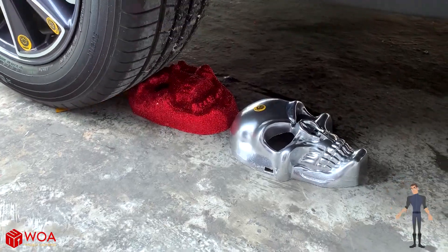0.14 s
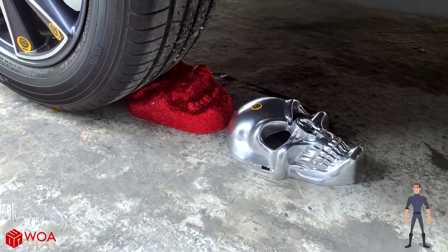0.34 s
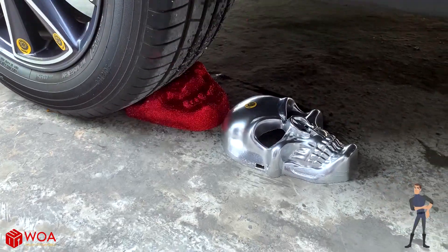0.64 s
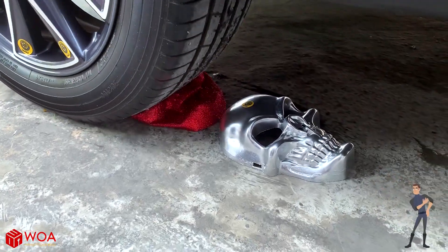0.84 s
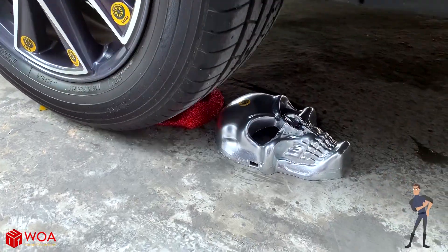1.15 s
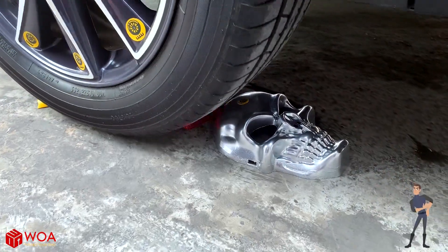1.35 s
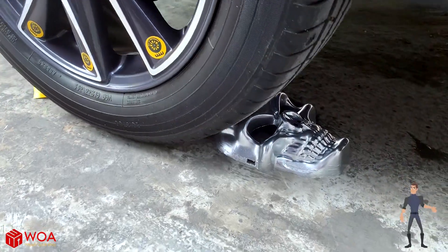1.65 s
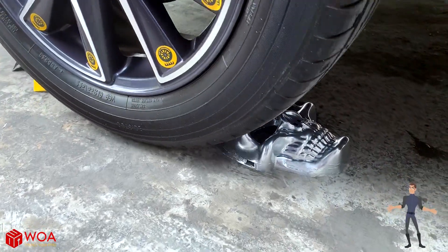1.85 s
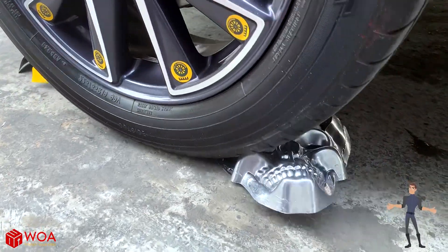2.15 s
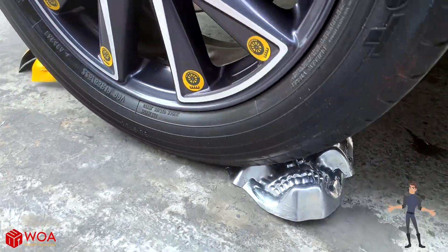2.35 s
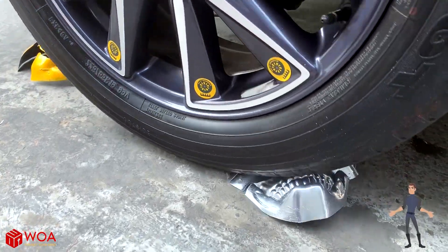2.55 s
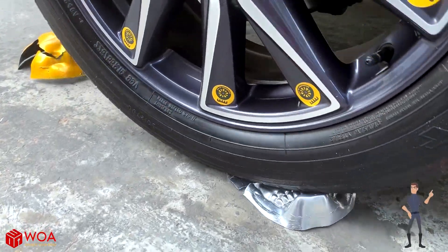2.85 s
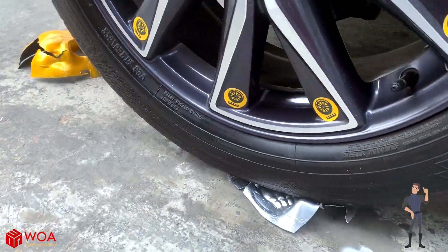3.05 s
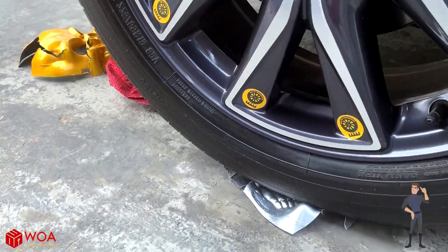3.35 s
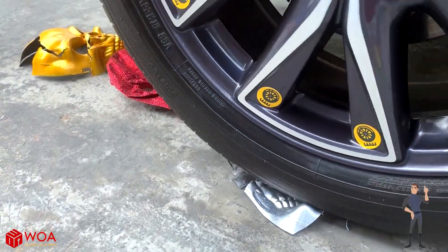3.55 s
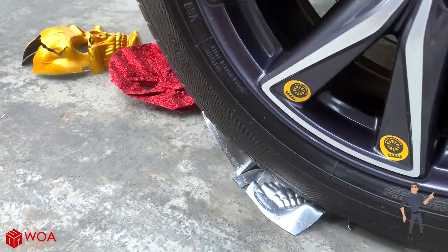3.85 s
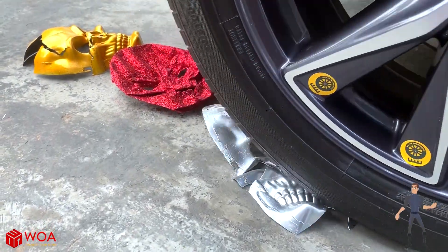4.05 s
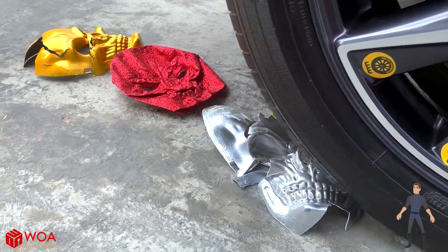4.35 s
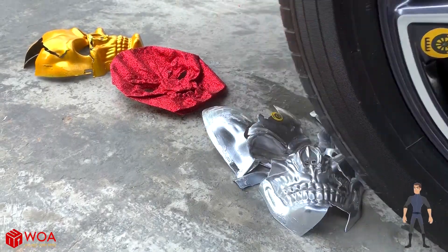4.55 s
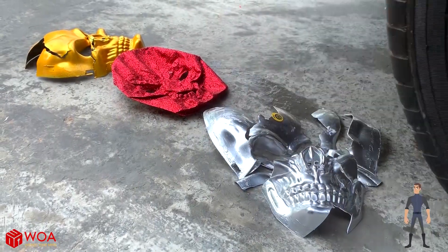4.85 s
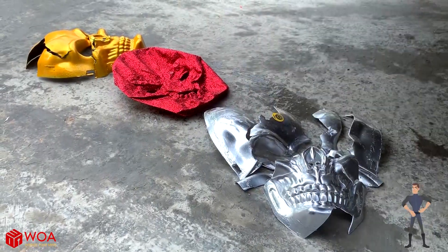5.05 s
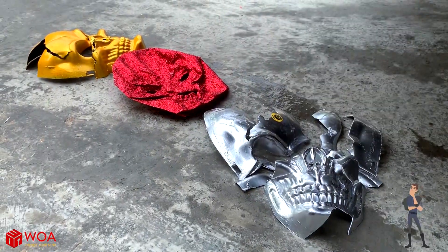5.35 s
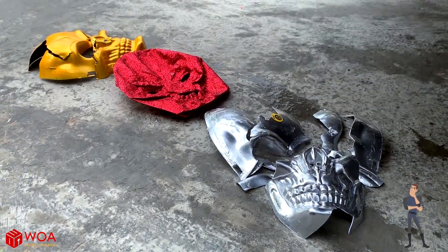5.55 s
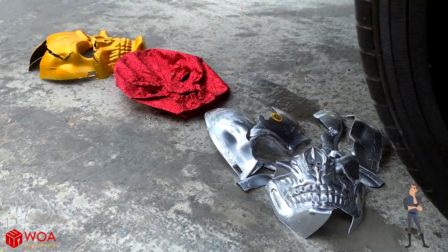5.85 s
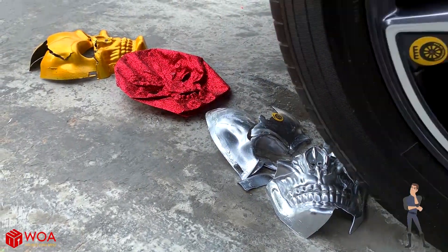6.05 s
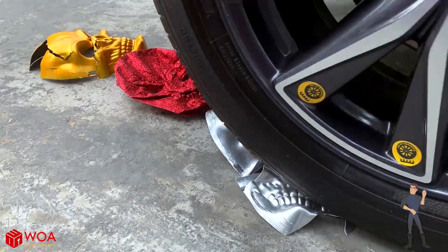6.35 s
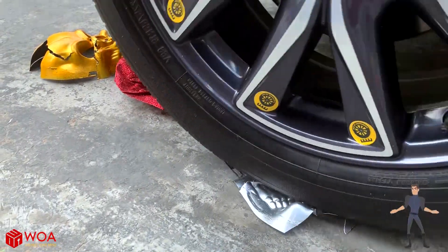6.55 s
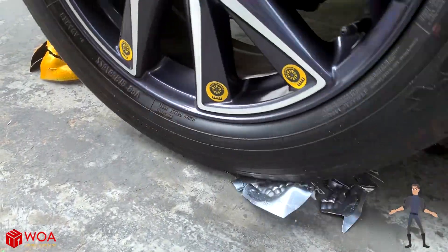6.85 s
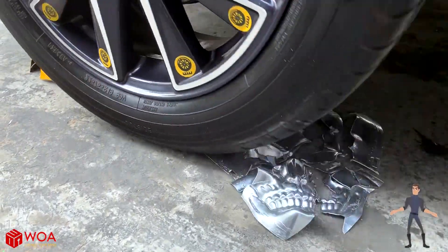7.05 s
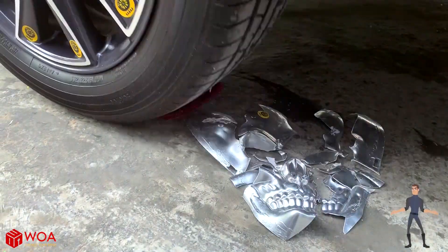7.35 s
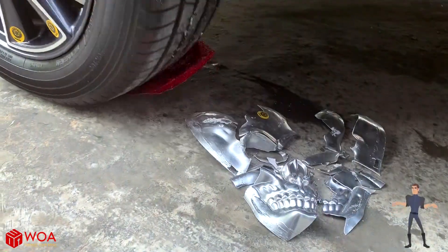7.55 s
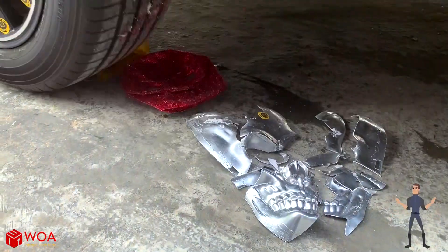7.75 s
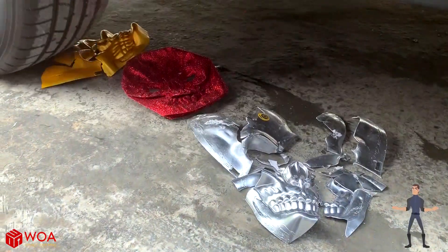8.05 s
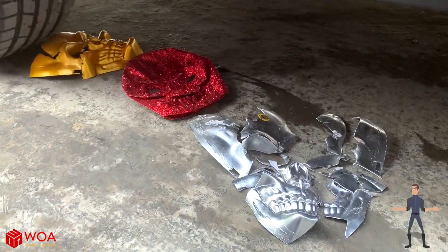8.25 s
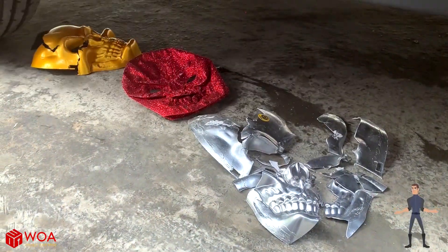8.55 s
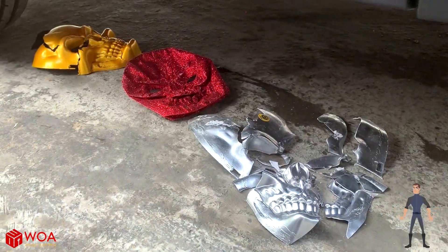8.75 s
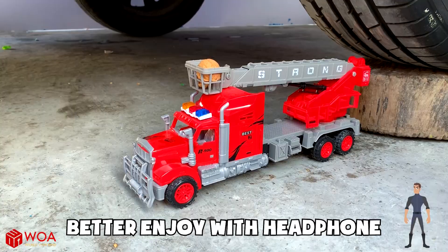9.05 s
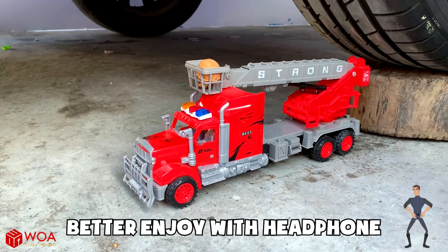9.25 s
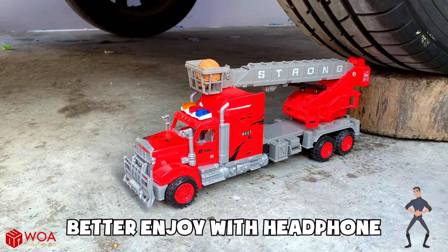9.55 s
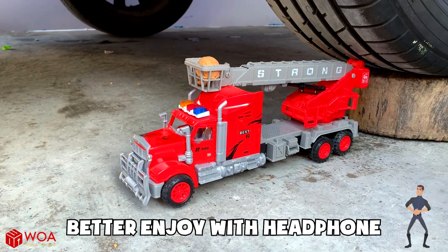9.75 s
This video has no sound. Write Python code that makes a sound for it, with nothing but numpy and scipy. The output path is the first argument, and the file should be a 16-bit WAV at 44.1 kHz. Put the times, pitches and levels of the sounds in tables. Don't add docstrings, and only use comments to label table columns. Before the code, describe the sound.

A car engine idles throughout, a low fluttering rumble with soft hiss and ticks, heard close to a tyre on concrete. From 0 to 0.7 s a hollow plastic shell snaps and crunches with soft tyre thuds; from 0.7 to 1.7 s a tougher one buckles in quick knocks and creaks. At about 1.75 s a brittle shell caves in, with the loudest, clipping cracks near 1.9-2.05 s, then splintering and heavy thuds until 3.4 s, fading to small ticks by 4.3 s. Mostly engine remains, quieter, with slight changes at 5.4 and 5.6 s. From 6.2 s the car rolls back over the pieces, crackling, with hard snaps around 7.2-7.3 s, as the engine sags. Creaks thin out by 8.3 s and a faint belt squeak appears. After a tiny silence at 9.05 s, idle is hissier and tickier with a steady whine, slowing, and faint plastic pieces settle near 9.75 s.

```python
import sys
import numpy as np
from scipy import signal
from scipy.fft import rfft, irfft, next_fast_len
from scipy.io import wavfile
from scipy.ndimage import uniform_filter1d, map_coordinates

SR = 44100
rng = np.random.default_rng(int(sys.argv[2]) if len(sys.argv) > 2 else 0)


def int16_out(signal):
    q = np.round(np.clip(np.atleast_2d(signal).T, -1, 1) * 32767)
    wavfile.write(sys.argv[1], SR, q.astype(np.int16))


def level_to_linear(level):
    exponent = np.asarray(level, float) / 20
    return 10 ** exponent


N = 437472
LAST_SHOT_S = 9.05


def unit(x):
    return x / np.sqrt(np.mean(x ** 2) + 1e-20)


def along(points, hz):
    f, v = np.transpose(points)
    return np.interp(np.log(hz + 1), np.log(f + 1), v)


def curves(rows, outside=None):
    s, *cols = np.transpose(rows)
    return [np.interp(np.arange(N) / SR, s, c, outside, outside) for c in cols]


def wobble(rate):
    knots = rng.standard_normal(int(N * rate / SR) + 4)
    return map_coordinates(knots, [np.arange(N) * rate / SR])


def spread(pair, spectrum, alike):
    m = next_fast_len(N + 8192)
    hz = np.fft.rfftfreq(m, 1 / SR)
    turn = np.arccos(np.clip(along(alike, hz), -1, 1)) / 2
    mid, side = rfft(pair, m) * level_to_linear(along(spectrum, hz)) * [np.cos(turn), np.sin(turn)]
    return unit(irfft([mid + side, mid - side], m)[:, :N])


def place(s, rows):
    at = np.round(np.asarray(s) * SR).astype(int)[:, None] + np.arange(rows.shape[1])
    return np.bincount(np.clip(at, 0, N).ravel(), rows.ravel(), N + 1)[:N]


# multiple, level_db under order 3
WEAK_ORDERS = [(2, -7), (4, -8), (6, -9.5), (7, -23), (8, -12.5), (9, -18.5), (10, -15.5), (11, -31.5),
               (12, -21), (14, -27.5), (16, -18)]


def firing_orders(rate, load_db, turn):
    t = np.arange(N) / SR
    first_db = np.where(t > LAST_SHOT_S, load_db + 0.5, 0.74 * load_db - 3.5 + 3.5 * (rate - 23.3))
    boom_hz, boom_width_hz, boom_db = 106.9, 3, 7.5
    boom = boom_db * np.exp(-((5 * rate - boom_hz) / boom_width_hz) ** 2)
    fifth_db = load_db + np.where(t > LAST_SHOT_S, -3.5, boom)
    orders = [(1, first_db), (3, load_db), (5, fifth_db)]
    orders += [(k, load_db + db) for k, db in WEAK_ORDERS]
    drift = [.06 * k * wobble(6) - .07 * k * k for k, _ in orders]
    tone = 0
    for (k, db), slip in zip(orders, drift):
        tone = tone + level_to_linear(db + wobble(7.6)) * np.cos(k * turn + slip - .9)
    return -np.sqrt(2) * tone * level_to_linear([[-.6], [.6]])


# pitch_hz, level_db
BELT_WHINE = [(517, -59), (597.5, -50)]


def belt(turn):
    t = np.arange(N) / SR
    squeak_db = -62.5 - 5 * (t > 8.85) + 10 * np.cos(turn) + 2 * wobble(14)
    squeak = level_to_linear(squeak_db) * np.sin(2 * np.pi * 3230 * t + 1.1 * wobble(250)) * (t > 8.44)
    whine = 0
    for hz, db in BELT_WHINE:
        level = level_to_linear(db + 6 + .8 * wobble(9))
        whine = whine + level * np.sin(2 * np.pi * hz * t + 0.3 * wobble(25))
    return squeak + whine * (t > LAST_SHOT_S)


# time_s, firing_rate_hz, load_db
IDLE = [(0, 22.3, -30), (.45, 22.3, -31), (.58, 23.4, -30), (1.6, 23.4, -28), (2.3, 23.3, -29),
        (3, 23.3, -32), (3.7, 23.1, -39), (4.05, 22.8, -38), (4.3, 23.5, -37), (5.35, 22.8, -36),
        (5.65, 23.6, -32), (6.5, 22.55, -29), (6.85, 22.1, -27), (7.5, 21.1, -30.5), (8.3, 20, -38),
        (9.04, 21, -39), (9.07, 21, -40), (9.92, 18.85, -40)]
# frequency_hz, density_db_per_hz
ROAR_COLOUR = [(15, -27), (25, -4), (119, -4), (209, -13), (275, -14), (362, -20), (1500, -34.5),
               (1950, -70.5), (3300, -120)]
# frequency_hz, density_db_per_hz
HISS_COLOUR = [(410, -5), (700, -12), (1770, -16.5), (2170, -18), (5110, -25.5), (8000, -38), (10400, -64),
               (17600, -120)]
# frequency_hz, density_db_per_hz
TICK_COLOUR = [(3820, -36.5), (6500, -10), (7570, -11), (9700, -10), (11300, -4), (13100, -6), (15500, -21)]
# frequency_hz, left_right_likeness
ENGINE_WIDTH = [(60, 0.98), (300, 0.69), (700, 0.2), (1500, -0.35), (3000, 0.073), (15000, -0.097)]
# start_s, hiss_db, tick_db, tick_rise_db_per_s (as the car backs up)
CAMERA_SPOTS = [
    (0, -51.5, -65, -0.5),
    (5.39, -55.5, -72.5, 6),
    (5.626, -48, -63.5, 2.5),
    (9.05, -46, -53.5, 3),
]


def engine():
    t = np.arange(N) / SR
    rate, load_db = curves(IDLE)
    turn = 2 * np.pi * np.cumsum(rate) / SR
    spots = np.transpose(CAMERA_SPOTS)
    start, hiss_db, tick_db, rise = spots[:, np.searchsorted(spots[0], t, 'right') - 1]
    tick_db = tick_db + rise * (t - start)

    def puffs(depth_db, order):
        return rng.standard_normal((2, N)) * level_to_linear(depth_db * np.cos(order * turn) + 1.3 * wobble(32))

    muffled = np.abs(t - 5.51) < .12
    roar_db = load_db + 1.6 + 2.2 * wobble(6) - 3 * muffled
    roar = level_to_linear(roar_db) * spread(puffs(2.5, 2), ROAR_COLOUR, ENGINE_WIDTH)
    hiss = level_to_linear(hiss_db + 5.5) * spread(puffs(0.86, 0.94), HISS_COLOUR, ENGINE_WIDTH)
    shaded = [(hz, db - 14 * (hz > 11000)) for hz, db in TICK_COLOUR]
    open_ticks = spread(puffs(3.7, 1), TICK_COLOUR, ENGINE_WIDTH)
    shaded_ticks = spread(puffs(3.3, 0.87), shaded, ENGINE_WIDTH)
    ticks = level_to_linear(tick_db + 4) * np.where(t > LAST_SHOT_S, open_ticks, shaded_ticks)
    return firing_orders(rate, load_db, turn) + roar + hiss + ticks + belt(turn)


# frequency_hz, t60_s
YARD_DECAY = [(300, 0.27), (2000, 0.26), (10000, 0.3)]


def yard(x):
    hz, t, z = signal.stft(x, SR, nperseg=256)
    fade = level_to_linear(-120 * t[:120] / along(YARD_DECAY, hz)[:, None]) * (t[:120] > .004)
    fade = fade / fade.sum(axis=1, keepdims=True)
    power = signal.fftconvolve(np.abs(z) ** 2, fade[None], axes=2)[..., :len(t)]
    air = signal.stft(rng.standard_normal((2, N)), nperseg=256)[2]
    air = air + air[::-1] / 2
    air = air / np.sqrt(np.mean(np.abs(air) ** 2))
    return signal.istft(np.sqrt(np.abs(power)) * air, nperseg=256)[1][:, :N]


# start_s, peak_db, thud_hz, tyre_air_db
TYRE_DROPS = [(0.069, -11.5, 317, -11), (0.218, -12, 103, -19), (0.589, -26, 300, -7.5),
              (1.769, -23, 315, -1), (1.964, -2, 143, -15), (2.018, -1.5, 198, -20.5),
              (2.622, -5.5, 90.5, -23), (2.79, -10.5, 260, -20), (2.899, -14.5, 196, -2),
              (3.158, -10.5, 266, -8), (3.202, -7, 122.7, -15.5), (7.298, -14, 105.7, -15.5)]


def drops():
    s, db, hz, air_db = np.transpose(TYRE_DROPS)[:, :, None]
    t = np.arange(SR * 3 // 4) / SR
    tyre_hz = 196
    thud = level_to_linear(db + 1 - 60 * t / 0.097) * np.sin(2 * np.pi * hz * t) * (1 - np.exp(-t / 0.0028))
    air = level_to_linear(db + air_db - 60 * t / 1.73) * np.sin(2 * np.pi * tyre_hz * t) * (1 - np.exp(-t / 0.0041))
    return place(s[:, 0], thud + air)


def grains(count, hz, cycles, scatter_db):
    t, pair = np.arange(384) / SR, []
    for _ in range(2):
        luck = rng.random((count, 2))
        f = np.clip(hz * np.exp(0.667 * rng.standard_normal((count, 1))), 100, SR / 2.2)
        size = level_to_linear(-scatter_db * np.log(luck[:, :1] + 1 / 50))
        grain = size * np.exp(-t * f / cycles) * np.sin(2 * np.pi * f * t)
        pair.append(place(luck[:, 1] * N / SR, grain))
    return unit(np.array(pair) * level_to_linear(3.36 * wobble(40)))


def mottled(x, patchy_db):
    z = signal.stft(x, nperseg=256)[2]
    field = uniform_filter1d(rng.standard_normal(z.shape[1:]), size=3, axis=0)
    field = uniform_filter1d(field, size=9, axis=1)
    return unit(signal.istft(z * level_to_linear(patchy_db * unit(field)), nperseg=256)[1][:, :N])


# splinter_db re pressure, then rows of time_s, pressure_db
CRUSH_BOUTS = [
    (-7, [(0, -24), (.1, -22.5), (.43, -29.5), (.6, -25.5), (.7, -29), (.8, -26.5), (1, -26.5), (1.25, -26.5), (1.73, -31)]),
    (-5.5, [(1.73, -36), (1.92, -22), (2.11, -24.5), (2.3, -34.5), (2.67, -27.5), (2.89, -23), (3.72, -47), (4.4, -87)]),
    (-5, [(6.2, -51), (6.25, -39), (6.36, -32.5), (6.48, -34), (6.56, -41), (6.78, -33.5), (7, -26.5)]),
    (-10, [(7, -28.5), (7.17, -24), (7.36, -26.5), (7.55, -28.5), (7.8, -30), (7.96, -38.5), (8.26, -44), (8.45, -47)]),
    (-26, [(9.72, -51), (9.75, -41), (9.78, -51), (9.81, -43), (9.84, -45), (9.92, -49.5)]),
]


def pressure():
    bouts = [curves(bout, outside=-120)[0] + [[0], [db]] for db, bout in CRUSH_BOUTS]
    return np.max(bouts, axis=0)


# centre_s, half_length_s, rise_db
CRUSH_SWELLS = [(0.001, 0.024, 6.5), (0.33, 0.031, 3), (4.047, 0.052, 17.5), (7.884, 0.055, 8.5),
                (10, 0.012, 9), (9.5, 0.028, 10), (6.6, 0.029, 5.5), (2.2, 0.12, -4.5), (2.2, .02, 0),
                (2.035, 0.021, 8.5), (3.33, 0.026, -6.5), (0.274, 0.0091, 4.5), (9.8, .03, 8), (9.5, 0.054, 6),
                (7.42, .06, 5)]
# frequency_hz, level_db
SHELL_COLOUR = [(150, -6.5), (450, -3.5), (1200, 2), (2500, -0.5), (5000, -26)]
# frequency_hz, density_db_per_hz
SPLINTER_COLOUR = [(880, -5), (1500, -9), (2330, -8), (2900, 1), (4180, 2), (7090, -2), (8210, -2.5),
                   (11300, -9), (13800, -14), (15500, -33)]
# frequency_hz, left_right_likeness
TOY_WIDTH = [(300, .98), (800, 1), (2500, .65), (8000, .75)]


def crushing():
    shell_db, splinter_db = pressure()
    scrape = rng.standard_normal((2, 2, N)) * level_to_linear(2.1 * wobble(90))
    creak = grains(count=9000, hz=1007, cycles=2.2, scatter_db=2) + 1.1 * scrape[0]
    fizz = grains(count=5000, hz=4680, cycles=.9, scatter_db=1.8) + 1.1 * scrape[1]
    t = np.arange(N) / SR
    swell_db = sum(db * np.exp(-((t - s) / half) ** 4) for s, half, db in CRUSH_SWELLS)
    creak, fizz = mottled(creak, patchy_db=2.2), mottled(fizz, patchy_db=2.8)
    bed = level_to_linear(shell_db - 0.5) * spread(creak, SHELL_COLOUR, TOY_WIDTH)
    bed += level_to_linear(splinter_db + 4.5) * spread(fizz, SPLINTER_COLOUR, TOY_WIDTH)
    return level_to_linear(swell_db) * bed


# start_s, peak_db, ring_hz, splinter_db re peak
FIRST_SHELL = [(.069, 2, 510, -7), (.078, 11, 850, -12), (.129, -0.5, 800, -17.5), (.206, -0.5, 710, -26.5),
               (0.224, 6, 508, -32), (.277, 2, 860, -6), (0.278, -12, 3040, -16.5), (0.401, -6, 375, -41),
               (.476, -6.5, 1010, -15), (0.572, 9.5, 2390, -13), (.591, 6, 463, -10),
               (0.686, -16, 1060, -3.5), (0.743, -24.5, 400, 10), (1.064, -5.5, 1960, -12.5),
               (1.082, 0.5, 1380, -11.5), (1.188, -8.5, 440, -11.5), (1.475, 3.5, 616, -26)]
# start_s, peak_db, ring_hz
TOUGH_SHELL = [(0.743, 7, 3170), (0.756, 7, 806), (0.765, 6, 710), (.782, 10.5, 560), (.796, 4.5, 1340),
               (0.814, 10, 760), (0.825, 3.5, 990), (0.853, 6, 703), (.874, 1, 920), (.897, -3.5, 940),
               (.942, 9, 600), (1.112, 0.5, 1760), (1.118, 8.5, 1730), (1.169, 6, 860), (1.224, 3.5, 1870),
               (1.231, 7, 1450), (1.279, 1, 970), (1.308, -6.5, 927), (1.504, -12, 503),
               (1.599, -0.5, 1380), (1.611, 1.5, 1410), (1.658, -6.5, 2930), (1.693, -2, 1340)]
# start_s, peak_db, ring_hz
TOUGH_SHELL_BACK = [(6.903, -2.5, 1560), (6.915, 5, 1860), (7.05, 3, 1890), (7.125, -5.5, 1930),
                    (7.211, 15, 1930), (7.218, 7, 1866), (7.285, -2.5, 2600), (7.302, 7.5, 960),
                    (7.308, 11.5, 2530), (7.398, -5, 1260), (7.728, -9.5, 1190), (7.792, -12.5, 1032),
                    (8.047, -2.5, 1860)]
# start_s, peak_db, ring_hz, splinter_db re peak
BRITTLE_SHELL = [(1.734, 4.5, 3500, -21), (1.769, 6.5, 1160, -18.5), (1.769, 11.5, 1020, -11.5),
                 (1.794, 7.5, 2470, -12), (1.813, 6.5, 627, -5.5), (1.859, 15, 581, -27.5),
                 (1.871, 0.5, 655, -1.5), (1.889, 2.5, 620, -14.5), (1.918, 19, 624, -12),
                 (1.945, 13.5, 970, -14.5), (2.018, 15, 890, -12), (2.042, 5.5, 693, -7.5),
                 (2.055, 1.5, 860, -14.5), (2.221, -4.5, 610, -37), (2.277, 5.5, 1910, -38.5),
                 (2.279, -5, 680, -35), (2.311, -3, 1540, -16.5), (2.339, 2, 646, -29),
                 (2.381, 6.5, 2040, -10), (2.418, 5, 2070, -11), (2.479, 6.5, 2210, -11),
                 (2.528, -2, 2166, -7), (2.548, 5.5, 1310, -9), (2.583, 8.5, 2580, -10),
                 (2.603, -1, 1260, -1), (2.637, -2.5, 530, -2)]
# start_s, peak_db, ring_hz, splinter_db re peak
PRESSED_FLAT = [(2.664, 0, 654, -3), (2.682, -5, 600, -3.5), (2.713, -6.5, 3350, 1.5),
                (2.728, 9.5, 2100, -19), (2.773, -1.5, 3160, -2.5), (2.79, 6.5, 820, -18.5),
                (2.797, 6.5, 836, -9.5), (2.834, 0, 800, -1.5), (2.864, -12, 746, 4.5),
                (2.881, 5.5, 2540, -10.5), (2.938, 6, 760, -9), (2.965, 3.5, 630, -5.5), (3, 10, 1164, -13),
                (3.033, -4.5, 985, -7.5), (3.057, 4.5, 1100, -7.5), (3.156, 1, 616, -11),
                (3.166, -2, 675, -5.5), (3.208, 1, 676, -9), (3.295, -10.5, 670, -2),
                (3.366, -16.5, 680, 0), (3.377, -2.5, 740, -6.5), (3.42, 6, 1310, -16.5),
                (3.519, -32.5, 2980, 4), (3.592, -19, 1620, -13), (3.749, -26.5, 840, -7.5),
                (3.846, -25, 1780, -9.5), (3.921, -18, 1160, -16.5), (3.998, -11.5, 1380, -8),
                (4.185, -31, 1080, -19), (4.347, -20.5, 1410, -47)]
# start_s, peak_db, ring_hz,
# splinter_db re peak
ROLLING_BACK = [(6.35, -17.5, 1250, 8), (6.52, -18, 903, -1), (6.525, -5.5, 850, -0.5),
                (6.542, -9.5, 633, -8), (6.551, -12.5, 937, -4.5), (6.57, 2, 1023, -7.5),
                (6.628, 3, 1063, -13.5), (6.668, 4, 864, -8), (6.697, -3, 906, -9),
                (6.705, -2.5, 644, -7.5), (6.771, -4.5, 650, 4.5), (6.873, -4, 2510, -8),
                (6.944, -17.5, 810, -0.5), (6.972, -4, 1360, -12), (9.749, -22.5, 720, -10.5),
                (7.507, 0.5, 1940, -50), (7.636, -3.5, 1490, -34)]
# start_s, peak_db, ring_hz
THIN_SLIVERS = [(0.5337, -17, 6450), (0.5495, -8.5, 5970), (0.578, -2.5, 8100), (0.858, 1, 3980),
                (0.871, -3, 4530), (0.9241, -8.5, 4840), (1.079, 2, 6100), (1.151, -20, 4340),
                (1.1895, -7, 5500), (1.224, -11, 8050), (1.2434, -25, 4960), (1.303, -8.5, 10200),
                (1.3323, -8, 4370), (1.3823, -8, 8000), (1.475, -2.5, 8500), (1.6013, -14.5, 8160),
                (1.656, -9, 8750), (1.688, -7, 6300), (1.732, -22, 4100), (1.9764, -10.5, 4750),
                (2.309, -16, 4140), (2.6504, -5, 7200), (2.9467, -3, 7800), (2.978, 1.5, 8150),
                (3.0258, 6, 7800), (3.366, -6, 10300), (3.5434, -35, 4130), (3.6661, -32, 6340),
                (3.969, -26, 4600), (4.0297, -22, 4080), (6.227, -21.5, 8500), (6.2432, -18, 4240),
                (6.318, -16.5, 6040), (6.4524, -25.5, 8680), (6.518, -14, 7700), (6.538, -7, 7300),
                (6.9005, -17, 4370), (7.053, -10, 5970), (7.1206, -2, 3860), (7.6147, -11, 8670),
                (7.977, -20.5, 4500)]
# start_s,
# peak_db, ring_hz
FURTHER_BUCKLES = [(0.011, -2.5, 680), (0.104, -3, 850), (0.152, -9.5, 840), (0.514, -6, 790), (0.666, -1, 550),
                   (0.974, -14.5, 740), (1.043, -6, 1020), (1.152, -3, 840), (1.243, -9, 607), (1.457, -6, 650),
                   (1.505, -1.5, 597), (1.59, -6.5, 1010), (1.984, -2.5, 452), (2.552, -5.5, 594),
                   (2.64, -1.5, 585), (2.651, 0.5, 870), (2.918, 0.5, 724), (3.507, -17, 594),
                   (3.521, -28, 970), (3.531, -26, 860), (3.543, -15, 940), (3.838, -34, 465),
                   (3.998, -24, 1300), (6.313, -13.5, 1280), (7.105, -10, 816), (7.266, -20, 982),
                   (7.324, -11, 834), (7.982, -16.5, 960), (8.047, -3.5, 890),
                   (.227, -22, 508), (0.575, -11, 1030), (0.591, 11, 1010), (0.94, 1, 920), (1.229, 2, 1770),
                 (1.475, 4.5, 2077), (1.611, -3, 1900), (2.339, 11.5, 2030), (2.94, -24, 690),
                 (3.158, 5, 1060), (3.208, 1, 1050), (3.4195, -2.5, 1127), (3.999, -21, 766),
                 (3.999, -27, 1890), (4.348, -33, 1610), (6.91, 7.5, 2985), (6.922, 4.5, 1730),
                 (7.222, -12.5, 1980), (7.315, 0, 1510), (7.506, -1, 1380), (8.049, -1.5, 1860),
                 (8.316, -21, 2070), (8.29, -23, 3960), (8.346, -22, 1240), (9.747, -27, 2740),
                 (9.747, -34, 1510), (9.802, -21, 710), (9.81, -35, 1700), (0.271, -7, 2360),
                 (0.855, 5, 450), (7.862, -20, 1500), (7.911, -17, 2920), (6.571, 1, 1840),
                 (6.774, -2, 1530), (6.671, -6, 2220),
                   (0.81, 3, 957), (0.83, 1, 603), (0.84, -4.5, 910), (0.91, -4, 950), (0.97, -6.5, 800),
                 (3.166, -0.5, 406), (3.1865, -4, 800), (3.2954, 0, 2540), (6.9, 1, 936),
                 (7.267, -16, 1500), (8.208, -20, 775), (8.054, -13, 2840), (8.073, -6, 3100),
                 (0.064, -2.5, 2000), (0.208, -1, 1500), (0.099, 0.5, 390), (9.3, -22, 3200),
                 (1.935, 2.5, 720), (1.7, 6.5, 800), (1.776, 6, 820), (1.3, 4, 3300), (1.86, 8.5, 1800),
                 (2.03, 3.5, 550), (2.93, -0.5, 630), (0.99, -6.5, 720), (3.44, -25, 1150), (2, 3.5, 4600),
                 (1.8, 1.5, 4200), (0.758, 6, 1500), (0.98, 2, 430)]


def breaks():
    def buckle_splinter_db(hz):
        return -19 - np.log2(hz / 1000)

    tough = [(s, db, hz, buckle_splinter_db(hz)) for s, db, hz in TOUGH_SHELL + TOUGH_SHELL_BACK]
    dull = FURTHER_BUCKLES
    knocks = [(s, db - 3, hz, buckle_splinter_db(hz) - 6) for s, db, hz in dull]
    slivers = [(s, db - 3.5, hz, -10) for s, db, hz in THIN_SLIVERS]
    return np.array(FIRST_SHELL + tough + BRITTLE_SHELL + PRESSED_FLAT + ROLLING_BACK + knocks + slivers)


def snaps():
    s, db, hz, splinter_db = np.transpose(breaks())[:, :, None]
    t, luck = np.arange(SR // 25) / SR, rng.random((len(s), 8))
    swell = 1 - np.exp(-(t / .001) ** 2)
    sag = 1 + 0.23 * level_to_linear(-60 * t / 0.016)
    modes = [(1, 0), (0.5 + 0.27 * luck[:, :1], -15), (1.275 + 0.5 * luck[:, 1:2], -15),
             (1.7 + luck[:, 5:6], -17)]
    ring = 0
    for ratio, level_db in modes:
        f = np.minimum(hz * ratio, SR / 3) * sag
        life_s = 0.011 + 6.5 / f
        ring = ring + level_to_linear(level_db - 60 * t / life_s) * np.sin(2 * np.pi * f * t) * swell
    chip_hz = 5500 + 3500 * luck[:, 6:7]
    ring = ring + level_to_linear(splinter_db + 6 - 60 * t / .009) * np.sin(2 * np.pi * chip_hz * t) * swell
    since = t - .0115
    width = .0005 + .0007 * luck[:, 2:3] ** 2 + .0016 * np.minimum(level_to_linear(splinter_db + 6), 1)
    debris = 0.098 * np.exp(-np.abs(since) / np.where(since < 0, .005, .004))
    burst = np.exp(-.5 * (since / width) ** 2) + debris
    shell, splinter, body = [], [], []
    for side in (1, -1):
        pan_db = side * 3 * (luck[:, 3:4] - .55)
        lead_s = side * .00005 * luck[:, 4]
        shell.append(place(s[:, 0] - lead_s, level_to_linear(db - 2 + pan_db) * ring))
        splinter.append(place(s[:, 0] - .01, level_to_linear(db + splinter_db + pan_db) * burst))
        body.append(place(s[:, 0] - .01, level_to_linear(db - 14 + pan_db) * burst))
    splinter_noise = spread(rng.standard_normal((2, N)), SPLINTER_COLOUR, TOY_WIDTH)
    body_noise = spread(rng.standard_normal((2, N)), SHELL_COLOUR, TOY_WIDTH)
    return np.array(shell) + np.array(splinter) * splinter_noise + np.array(body) * body_noise


def scene():
    plastic, t = snaps(), np.arange(N) / SR
    left, right = plastic + crushing()
    others = np.roll(right, round(-.00005 * SR))
    brittle = np.roll(right, round(.00012 * SR))
    right = np.where((t > 1.6) & (t < 7), brittle, others)
    return np.array([left, right]) + level_to_linear(-12) * yard(plastic) + drops() + engine()


def low_pass(x):
    return signal.sosfilt(signal.butter(12, 15650, fs=SR, output="sos"), x)


# frequency_hz, level_db
MIC_COLOUR = [(6600, 0), (7250, -4), (7900, 1), (10500, 0), (11000, -15), (11700, -15), (12100, 2),
              (14600, 1), (15500, -25)]
# frequency_hz, left_over_right_db
MIC_LEAN = [(300, 0), (1500, 2), (3000, 2), (6000, -0.5), (10000, -5), (14000, 2)]
# frequency_hz, side_db
TOP_WIDTH = [(10500, 0.5), (12000, -7)]
# centre_s, half_length_s, gain_db
SCENE_CHANGES = [
    (5.392, .004, -8),
    (5.625, .004, -8),
    (9.047, .0088, -70),
]


def record(dry):
    m = next_fast_len(N + 8192)
    hz = np.fft.rfftfreq(m, 1 / SR)
    left, right = rfft(dry, m)
    mid = (left + right) / 2
    side = (left - right) / 2 * level_to_linear(along(TOP_WIDTH, hz))
    colour_db = along(MIC_COLOUR, hz) + along(MIC_LEAN, hz) * [[.5], [-.5]]
    heard = irfft([mid + side, mid - side] * level_to_linear(colour_db), m)[:, :N]
    mix = heard / (1 + np.abs(heard / .99) ** 12) ** (1 / 12)
    t = np.arange(N) / SR
    for s, half, db in SCENE_CHANGES:
        mix = mix * level_to_linear(db * np.clip((half - np.abs(t - s)) * 1000, 0, 1))
    return low_pass(mix)


dry = scene()
out = record(dry)
int16_out(out)
```